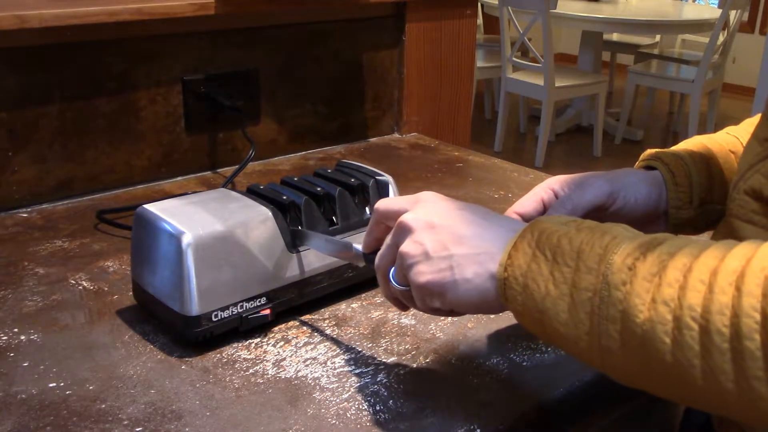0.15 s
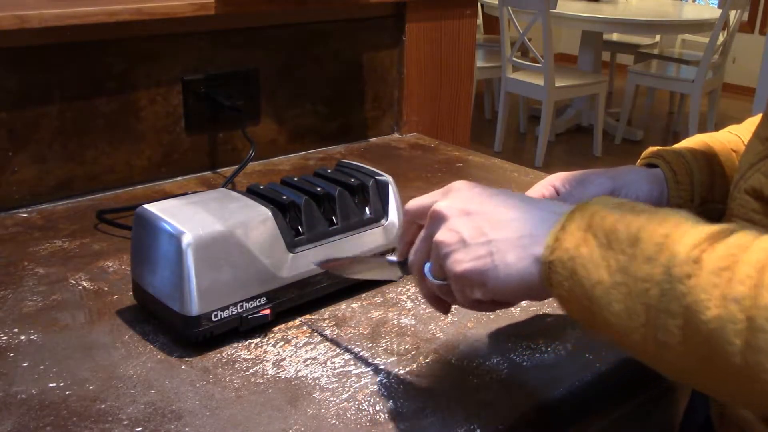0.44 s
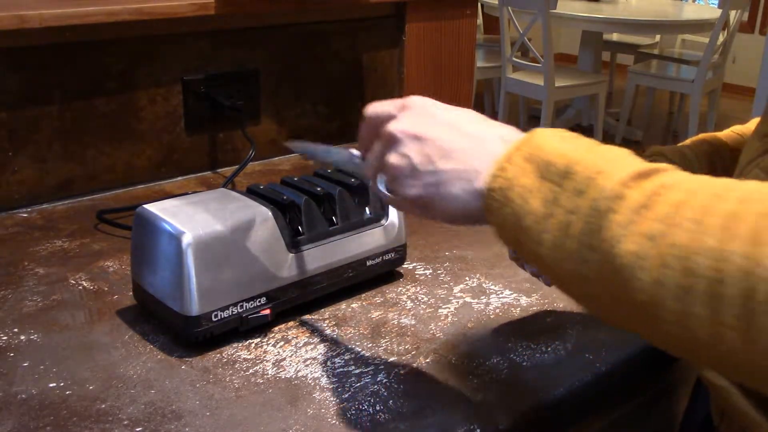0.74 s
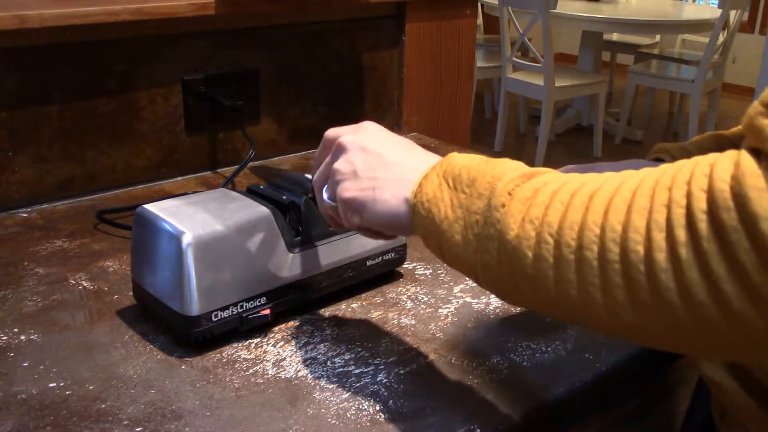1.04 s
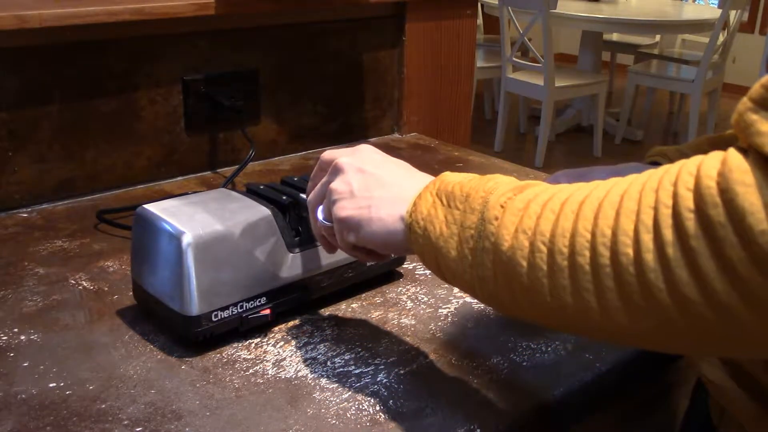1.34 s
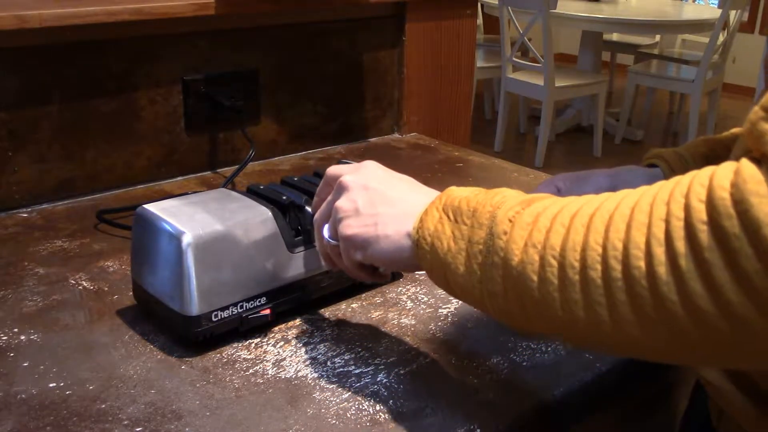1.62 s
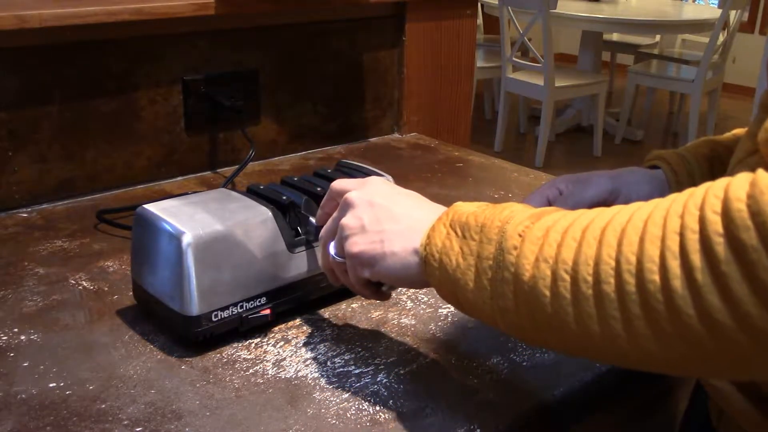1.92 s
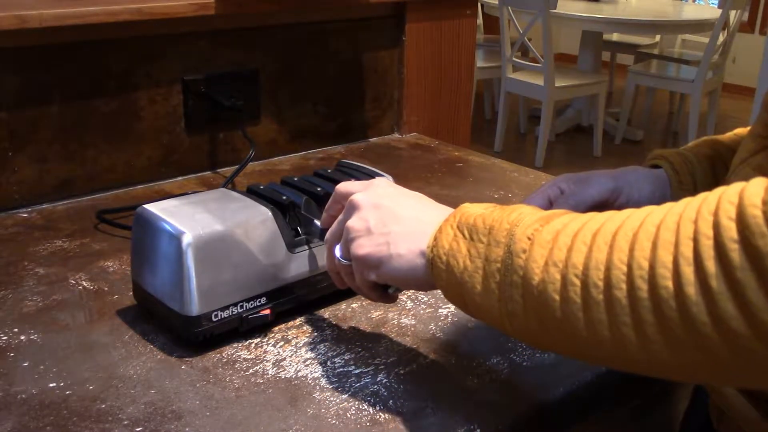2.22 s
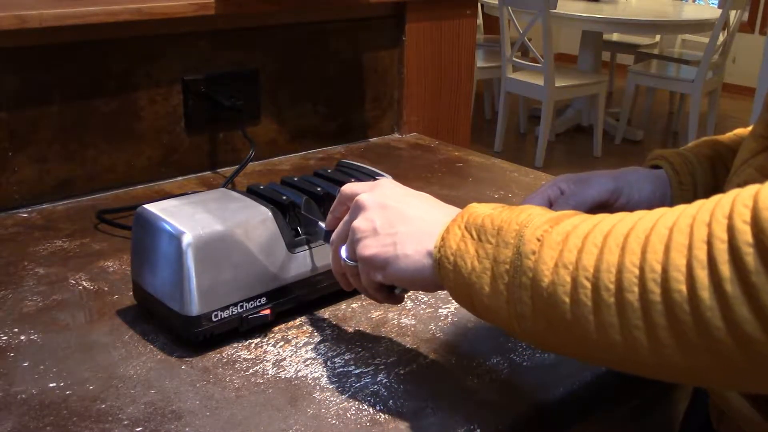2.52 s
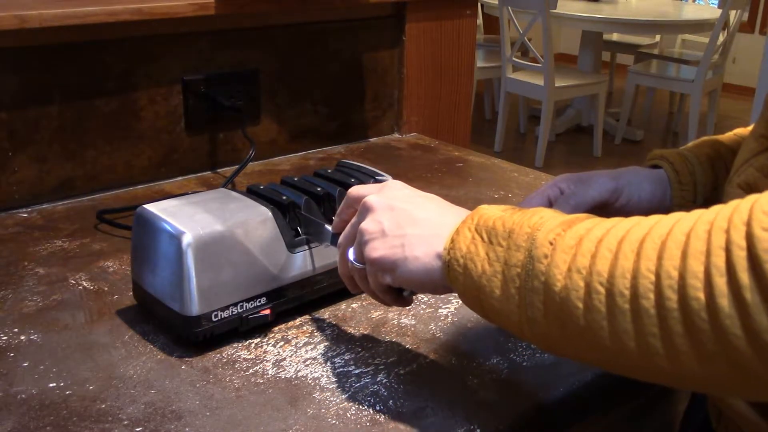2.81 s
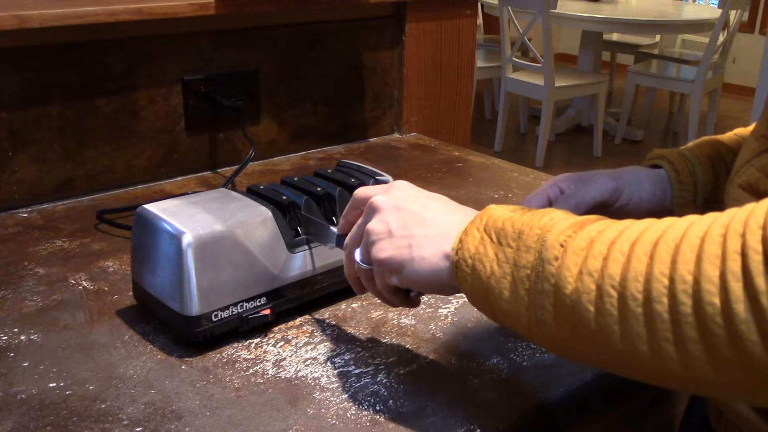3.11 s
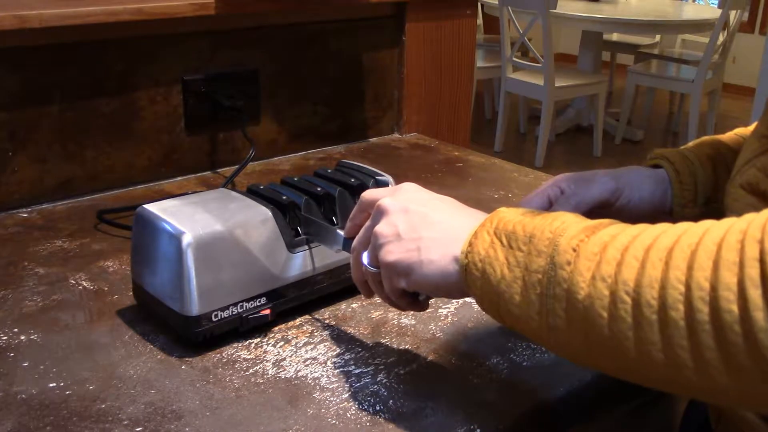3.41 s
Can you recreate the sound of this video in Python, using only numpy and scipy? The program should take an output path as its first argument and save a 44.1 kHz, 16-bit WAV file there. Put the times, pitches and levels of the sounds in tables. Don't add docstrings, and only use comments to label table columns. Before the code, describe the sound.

Knife blade grinding through a running electric sharpener, harsh metallic rasp in two pulls

```python
import sys
import numpy as np
from scipy import signal
from scipy.fft import rfft, irfft, next_fast_len
from scipy.io import wavfile

SR = 44100
rng = np.random.default_rng(int(sys.argv[2]) if len(sys.argv) > 2 else 0)


def waveform_to_disk(signal):
    frames = np.transpose(np.atleast_2d(signal))
    scaled = np.clip(frames, -1, 1) * 32767
    samples = np.round(scaled).astype(np.int16)
    wavfile.write(sys.argv[1], SR, samples)


def to_linear_factor(level_db):
    exponent = np.asarray(level_db, float) / 20
    return 10 ** exponent


N = 156555
T = np.arange(N) / SR
HZ = np.arange(N // 2 + 1) * SR / N

# pitch_hz, level_db
FLOOR_SPECTRUM = [(8.8, -34), (15, 1), (92, -12.5), (123, -7), (269, -15), (455, -8.5), (705, -16),
                  (8180, -23.5), (16000, -26)]
FLOOR_DB = -44.5
# pitch_hz, level_db
IDLE_HUM = [(118.4, -57), (242.2, -65.5), (371.4, -61), (457.6, -56.5), (565.2, -62.5)]
# pitch_hz, level_db
LOADED_HUM = [(445, -59), (453.8, -58), (462.5, -56), (471.3, -51), (509.5, -55), (518.2, -56),
              (527, -51.5), (556, -60)]
# pitch_hz, width_hz, level_db
DISC_WHIRR = [(4250, 500, -66), (6650, 450, -63), (7950, 450, -63.5)]
IDLE_WAVER_DB, LOADED_WAVER_DB = 1.3, 1.5
# start_s, level_db, low_hz, high_hz
HAND_TICKS = [
    (1.12, -49, 2000, 3600),
    (1.271, -49, 500, 3000),
    (1.285, -55, 3000, 13000),
    (1.268, -53, 9500, 11500),
    (1.525, -59, 6000, 11000),
]
TICK_T60_S = 0.031
ROOM_T60_S, ROOM_DB, WALL_CUT_HZ = 0.48, -22, 9400

TURNS_PER_S, SPEED_JITTER, GRIT_RENEWS_S = 55.6, 0.0012, 0.09
MAINS_PULL_HZ, MAINS_PULL_DEPTH = 120, 0.21
TILT_SHARE = 0.3
# pitch_hz, share_0_to_1
REPEATING_SHARE = [(500, 0.24), (3000, 0.81), (6000, 0.73), (10000, 0), (15000, 0.4)]
EDGE_SPOTS_1 = (.28, .55, .45, 5.0, 1.0)
GUIDE_SPOTS_1 = (.33, .4, .4, 5.0, 1.5)
EDGE_SPOTS_2 = (.42, .31, .95, 3.5, 1.15)
GUIDE_SPOTS_2 = (.77, .6, .55, 14.0, 1.5)
EDGE_ABOVE_HZ = 4800

# start_s, level_db, wobble_depth
PRESSURE_1 = [
    (0.0, -8.5, 0.42),
    (0.004, -19, 0.7),
    (.19, -22.5, 0.56),
    (.23, -19, 0.86),
    (0.314, -18, 0.49),
]
# start_s, level_db, wobble_depth
PRESSURE_2 = [
    (1.76, -19, 0.44),
    (1.79, -17, 0.63),
    (1.925, -17, 0.19),
    (2.1, -17.5, 0.33),
    (2.237, -18.5, 0.59),
    (2.5, -17.5, 0.56),
    (2.699, -18, 0.27),
    (2.815, -17, 0.44),
    (3.227, -19.5, 0.63),
    (3.55, -20.5, 0.33),
]
# start_s, level_db, hold_s, knock_db
LEAVING_SKIPS = [
    (0.318, -12.5, 0.0037, -49),
    (0.327, -9.5, 0.0025, -25),
    (0.336, -10, 0.0024, -50),
    (.346, -8, 0.0023, -29),
    (0.357, -19.5, 0.0017, -44),
    (0.364, -9.5, 0.0025, -19),
    (0.373, -13, 0.0023, -50),
    (0.381, -12, 0.0055, -10),
]
# start_s, level_db, hold_s, knock_db
LANDING_SKIPS = [
    (1.7072, -18.5, 0.0042, -29),
    (1.7218, -19.5, 0.0095, -50),
    (1.736, -15.5, 0.0048, -45),
    (1.747, -17, .008, -41),
]
SKIP_T60_S, KNOCK_T60_S, KNOCK_LOW_HZ, KNOCK_HIGH_HZ = 0.021, 0.019, 520, 6030
THUD_S, THUD_DB, THUD_T60_S = 0.328, -39, 0.055
# pitch_hz, width_hz, level_db
KNOCK_RINGS = [(612, 16, 15), (900, 40, 6), (3670, 12, 8), (5383, 10, 14)]

# pitch_hz, width_hz, level_db, strongest_at_s,
# spread_s
FIRST_PULL_MODES = [(2157, 80, -4.5, 0.26, 0.35), (2785, 108, -3.5, 0.34, 0.92), (3470, 174, -3, 0.22, 0.36),
                    (5420, 220, 5.5, 0.86, 0.036), (6250, 340, -2.5, 0.071, 0.12), (8060, 39, 8, .01, 0.083),
                    (9070, 160, 4, 0.15, 0.32), (9060, 270, 9, 0.322, 0.026), (9620, 100, 6, 0.1, 0.085),
                    (11300, 210, 9.5, 0.13, 0.14), (12300, 220, 2.5, 0.16, 0.067), (13350, 280, 7.5, 0.057, 0.074),
                    (13400, 580, 2.5, 0.31, 0.082), (14200, 530, 3.5, 0.15, 0.09),
                    (530, 79, -9, 0.046, 0.5), (1092, 24, -6.5, 0.35, 0.8), (1365, 200, -12, 0.3, 0.21),
              (1720, 17, -3, 0.29, 0.25), (5380, 125, -0.5, 0.15, 0.54), (5970, 340, 2.5, 0.292, 0.04),
              (9700, 340, 3.5, 0.336, 0.035), (7540, 160, 0, 0.305, 0.047)]
# pitch_hz, width_hz, level_db, strongest_at_s, spread_s
BELLY_MODES = [(7640, 91, -4.5, 1.9, 0.2), (7830, 95, 4, 2.71, 0.26), (9100, 120, -9.5, 1.88, 0.084),
               (9400, 130, -3, 2.9, 0.12), (9640, 870, 7, 7, 0.12), (9470, 130, 3, 2.34, 0.17),
               (10500, 330, 8.5, 3.13, 0.47), (12040, 140, -29, 1.9, 0.087), (11300, 240, 0, 2.08, 0.15),
               (10470, 380, 5, 2.55, 0.14), (13150, 150, 2, 1.86, 0.083), (12700, 140, -2, 2.5, 0.18)]
# pitch_hz, width_hz, level_db, strongest_at_s, spread_s
GUIDE_MODES = [(2340, 35, -26, 1.5, 1.2), (2834, 10, -12, 2.9, 0.5), (3210, 143, -3.5, 2.9, 0.74),
               (3275, 58, 1.5, 2.23, 0.58), (2588, 23, -1.5, 3.25, 0.29), (4320, 180, -1.5, 2.29, 0.6),
               (3970, 68, -6, 2.7, 0.21), (4720, 70, -1, 3.5, 0.14), (3520, 64, -10, 3.3, 0.34),
               (1226, 26, -12, 3.53, 0.88), (1377, 47, -18, 2.27, 0.74), (952, 23, -11.5, 3.36, 0.8),
               (2183, 28, -10.5, 2.58, 0.29)]
# pitch_hz, slide_hz_per_s, width_hz, level_db, strongest_at_s, spread_s
SLIDING_MODES = [(9240, 2500, 520, -1.5, 1.903, 0.12), (10470, 4000, 210, -7.5, 2.11, 0.17),
                 (12200, -1500, 1040, -1.5, 1.73, .1), (12760, 1500, 530, 0, 2.09, 0.11),
                 (9740, 1198, 280, 2.5, 2.89, 0.13), (11060, -3, 430, -4, 3.17, 0.09),
                 (9650, -4500, 820, 3, 3.486, 0.22), (7750, 1200, 210, 1, 2.47, 0.16),
                 (6470, 300, 370, -3.5, 2.86, 0.18), (9040, 500, 430, -3, 2.86, 0.052),
                 (13200, 0, 270, -4, 2.87, 0.11), (4290, 600, 150, -7.5, 3.464, 0.17),
                 (3510, 702, 330, -3.5, 3.197, 0.21), (5290, 1000, 310, -5, 2.72, 0.09),
                 (15600, 500, 320, -4, 1.88, 0.17), (14100, 0, 190, -19, 3.2, 0.09),
                 (12100, 0, 210, -2, 2.96, 0.1)]
SLIDE_SPREAD, SLIDE_NARROWEST_HZ = 1.4, 480
FADE_LIMIT_DB = 16
# pitch_hz, level_db_per_hz
RASP_SPECTRUM_1 = [(300, -36), (540, -5), (1750, -17), (2400, -24), (4500, -4), (5500, -2.5), (11000, 0),
                   (15800, -8)]
RASP_SPECTRUM_2 = [(300, -30), (500, -14.5), (1900, -24.5), (3000, -5.5), (4900, -9.5), (6500, -10),
                   (9600, -4), (15800, -9.5)]
RASP_DB = -8
MINOR_MODES_DB, MINOR_SPACING_HZ, MINOR_SHIFT_S = 3.0, 130, 0.3
# pitch_hz, slide_hz_per_s, width_hz, depth_0_to_1, deepest_at_s, spread_s
SHADED_BANDS = [(5720, 500, 1400, 0.74, 1.95, .2), (7480, -500, 980, 0.75, 2.35, 0.13),
                (15000, -1500, 1500, 0.7, 2.48, 0.23), (15200, 0, 1500, 0.7, 3.1, 0.22),
                (6900, 3, 2000, 0.2, 3.45, 0.11), (13300, 0, 1200, 0.7, 3.17, 0.22),
                (3720, 150, 620, 0.9, 2.7, 0.65), (1890, 0, 810, 0.9, 3.33, 0.37),
                (4800, 0, 530, 0.9, 1.9, 0.17), (1730, 0, 320, 0.2, 0.073, .15),
                (4550, 0, 980, 0.5, 0.059, 0.11), (7150, 0, 430, 0.7, 0.08, 0.13)]

CUTOFF_HZ, PEAK_LIMIT = 15830, 0.8


def rms_one(x):
    return x / np.sqrt(np.mean(x ** 2) + 1e-20)


def noise():
    return rng.standard_normal(N)


def at_hz(points, hz):
    point_hz, value = np.array(points).T[:2]
    return np.interp(np.log(hz), np.log(point_hz), value)


def drift(rate_hz):
    r = np.exp(-2 * np.pi * rate_hz * 40 / SR)
    steps = rng.standard_normal(N // 40 + 2002)
    slow = signal.lfilter([1], [1, -2 * r, r * r], steps)[2000:]
    return np.interp(np.arange(N) / 40, np.arange(len(slow)), rms_one(slow))


def colour(x, spectrum):
    hz = HZ + 1
    gain = to_linear_factor(at_hz(spectrum, hz)) * (hz > spectrum[0][0] / 2)
    return irfft(rfft(x) * rms_one(gain), N)


def band(x, low_hz, high_hz):
    return signal.sosfilt(signal.butter(2, [low_hz, high_hz], "band", fs=SR, output="sos"), x)


def resonate(x, hz, width_hz):
    r = np.exp(-np.pi * width_hz / SR)
    top = np.array([1, 0, -1]) * (1 - r * r) / 2
    return signal.lfilter(top, [1, -2 * r * np.cos(2 * np.pi * hz / SR), r * r], x)


def slide(x, hz, hz_per_s, width_hz, at_s):
    away = np.clip(T - at_s, -0.4, 0.4)
    spin = np.exp(2j * np.pi * np.cumsum(hz + hz_per_s * away) / SR)
    r = np.exp(-1.5 * np.pi * width_hz / SR)
    return 2 * np.real(spin * signal.lfilter([(1 - r) ** 2], [1, -2 * r, r * r], x / spin))


def burst(start_s, db, hold_s, t60_s):
    rise = np.clip((T - start_s) / 0.0007, 0, 1)
    return rise * to_linear_factor(db - 60 * np.clip(T - start_s - hold_s, 0, 1) / t60_s)


def room_floor():
    return to_linear_factor(FLOOR_DB - 2.5) * colour(noise(), FLOOR_SPECTRUM)


def kitchen(x):
    size = next_fast_len(N + SR)
    w = 2 * np.pi * np.arange(size // 2 + 1) / size
    wall = 1 / (1 + 1j * w * SR / (2 * np.pi * WALL_CUT_HZ)) ** 0.56
    echoes = 0
    for k, lag_s in enumerate(rng.uniform(0.008, 0.035, 14)):
        loop = to_linear_factor(-60 * lag_s / ROOM_T60_S) * wall * np.exp(-1j * w * lag_s * SR)
        echoes = echoes + (-1) ** k * loop / (1 - loop)
    return irfft(rfft(x, size) * echoes, size)[:N]


def unsteady_tones(table, waver_db, wander):
    total = np.zeros(N)
    for hz, db in table:
        level = np.sqrt(2) * to_linear_factor(db + waver_db * drift(3.2))
        total += level * np.sin(2 * np.pi * hz * T + hz + wander * drift(4.6))
    return total


def motor():
    whirr = sum(to_linear_factor(db) * rms_one(resonate(noise(), hz, width)) for hz, width, db in DISC_WHIRR)
    loaded = np.clip((T - 1.72) / 0.03, 0, 1)
    buzz = loaded * unsteady_tones(LOADED_HUM, LOADED_WAVER_DB, 0.15)
    return whirr + unsteady_tones(IDLE_HUM, IDLE_WAVER_DB, 0.6) + buzz


def ticks():
    total = np.zeros(N)
    for start, db, low, high in HAND_TICKS:
        total += band(burst(start, db + 11.5, 0.0059, TICK_T60_S) * noise(), low, high)
    return total


def knocks():
    taps = sum(burst(start, db, hold / 2, KNOCK_T60_S) for start, _, hold, db in LEAVING_SKIPS + LANDING_SKIPS)
    taps = taps * noise()
    rings = sum(to_linear_factor(db) * resonate(taps, hz, width) for hz, width, db in KNOCK_RINGS)
    thud = band(burst(THUD_S, THUD_DB + 22.5, 0.0042, THUD_T60_S) * noise(), 60, 310)
    return 1.43 * band(taps, KNOCK_LOW_HZ, KNOCK_HIGH_HZ) + rings + thud


def disc_grit():
    size = int(SR / TURNS_PER_S)
    turns = T * TURNS_PER_S + SPEED_JITTER * np.cumsum(drift(25)) * TURNS_PER_S / SR
    grain = (turns % 1 * size).astype(int)
    phases = np.exp(2j * np.pi * rng.random((200, size // 2 + 1)))
    tracks = rms_one(irfft(phases, size))
    walk = np.minimum(T / GRIT_RENEWS_S, 198)
    k = walk.astype(int)
    part = walk % 1 * np.pi / 2
    return tracks[k, grain] * np.cos(part) + tracks[k + 1, grain] * np.sin(part)


def contact(pull, first, second, share, sharp, deeper):
    start, db, depth = np.transpose(pull)
    turn = 2 * np.pi * (T * TURNS_PER_S - first + 0.0059 * drift(3.6))
    spots = np.exp(sharp * np.cos(turn) - sharp)
    spots = spots + share * np.exp(sharp * np.cos(turn - 2 * np.pi * second) - sharp)
    if second < 0.5:
        spots = spots + TILT_SHARE * np.cos(turn - np.pi * second)
    wobble = np.exp(deeper * np.interp(T, start, depth) * (spots - spots.mean()) + 0.058 * drift(240))
    inside = np.clip(np.minimum(T - start[0] + 0.0092, start[-1] + 0.0038 - T) / 0.007, 0, 1)
    mains = 1 + MAINS_PULL_DEPTH * np.sin(2 * np.pi * MAINS_PULL_HZ * T)
    return to_linear_factor(np.interp(T, start, db)) * wobble * inside * mains


def grit_force(force):
    again, fresh = force * disc_grit(), force * noise()
    share = np.clip(at_hz(REPEATING_SHARE, HZ + 1), 0, 1)
    both = rfft(again) * np.sqrt(share) + rfft(fresh) * np.sqrt(1 - share)
    low = 1 / (1 + (HZ / EDGE_ABOVE_HZ) ** 12)
    return irfft((both * [1 - low, low]).sum(axis=0), N)


def blade(force, modes, rasp, sliding=()):
    grit = grit_force(force)
    rings = np.zeros(N)
    coarse = T[::64]
    for k, (hz, width, db, best, over) in enumerate(modes):
        fade = 1 - np.exp(-((coarse - best) / over) ** 2)
        level = np.interp(T, coarse, to_linear_factor(db + 7 - FADE_LIMIT_DB * fade))
        rings += (-1) ** k * resonate(grit * level, hz, width)
    for hz, hz_per_s, width, db, best, over in sliding:
        push = grit * to_linear_factor(db + 6) * np.exp(-((T - best) / over) ** 2)
        rings += slide(push, hz, hz_per_s, max(SLIDE_SPREAD * width, SLIDE_NARROWEST_HZ), best)
    return np.array([rings, to_linear_factor(RASP_DB) * colour(grit, rasp)])


def minor_modes(x):
    out = np.zeros(N)
    for k, knots in enumerate(rng.standard_normal((13, 300))):
        near = np.clip(1 - abs(T / MINOR_SHIFT_S - k), 0, 1) ** 0.5
        ripple = to_linear_factor(MINOR_MODES_DB * np.interp(HZ / MINOR_SPACING_HZ, np.arange(300), knots))
        out += irfft(rfft(x * near) * rms_one(ripple), N)
    return out


def shade(x):
    for hz, hz_per_s, width, depth, best, over in SHADED_BANDS:
        amount = np.clip(depth, 0, 1) * np.exp(-((T - best) / over) ** 2)
        x = x - amount * slide(x, hz, hz_per_s, width, best)
    return x


def grinding():
    skips = sum(burst(start, db, hold, SKIP_T60_S) for start, db, hold, _ in LEAVING_SKIPS + LANDING_SKIPS)
    early = T < 1
    force_1 = np.array([contact(PRESSURE_1, *EDGE_SPOTS_1), contact(PRESSURE_1, *GUIDE_SPOTS_1)])
    force_2 = np.array([contact(PRESSURE_2, *EDGE_SPOTS_2), contact(PRESSURE_2, *GUIDE_SPOTS_2)])
    pull_1 = blade(force_1 + skips * early, FIRST_PULL_MODES, RASP_SPECTRUM_1)
    pull_2 = blade(force_2 + skips * ~early, BELLY_MODES + GUIDE_MODES, RASP_SPECTRUM_2, SLIDING_MODES)
    rings, rasp = pull_1 + pull_2
    return shade(minor_modes(rasp) + rings) + knocks()


def scene():
    near = grinding() + ticks()
    return (room_floor() + to_linear_factor(ROOM_DB) * kitchen(near) + motor() + near)[None]


def low_pass(x):
    return signal.sosfilt(signal.butter(12, 16480, fs=SR, output="sos"), x)


def record(dry):
    rounded = PEAK_LIMIT * np.tanh(dry / PEAK_LIMIT)
    cut = irfft(rfft(rounded) * (HZ < CUTOFF_HZ), N)
    return low_pass(cut)


dry = scene()
out = record(dry)
waveform_to_disk(out)
```